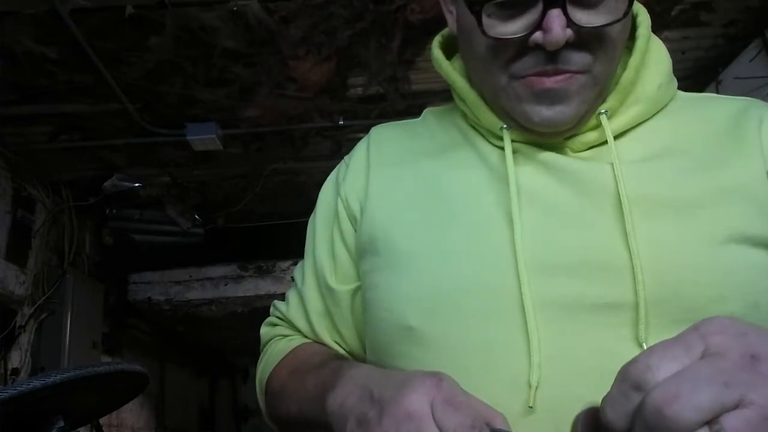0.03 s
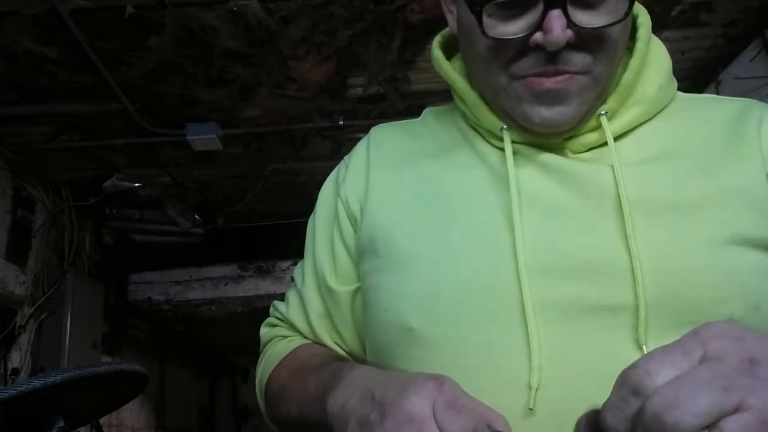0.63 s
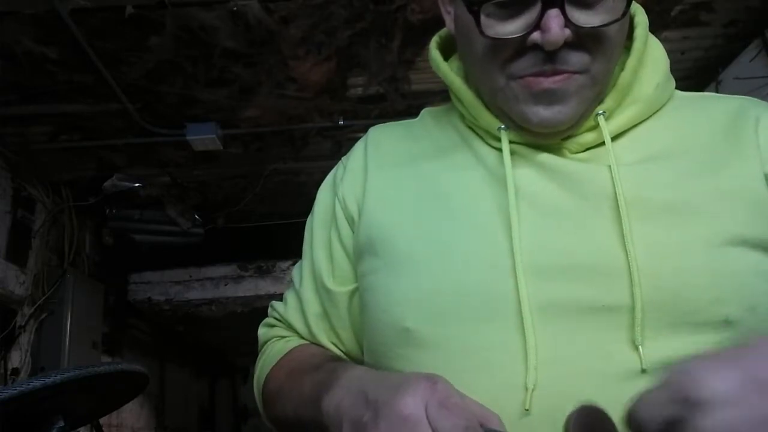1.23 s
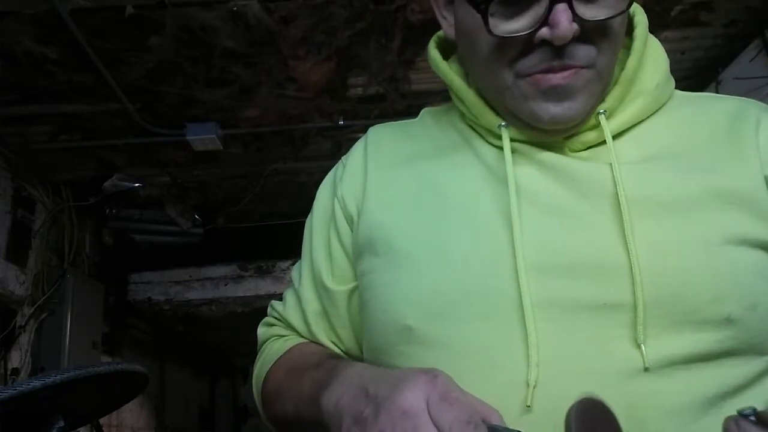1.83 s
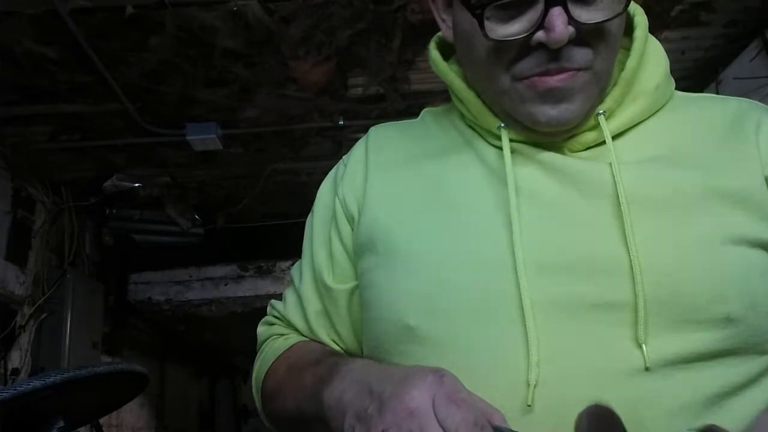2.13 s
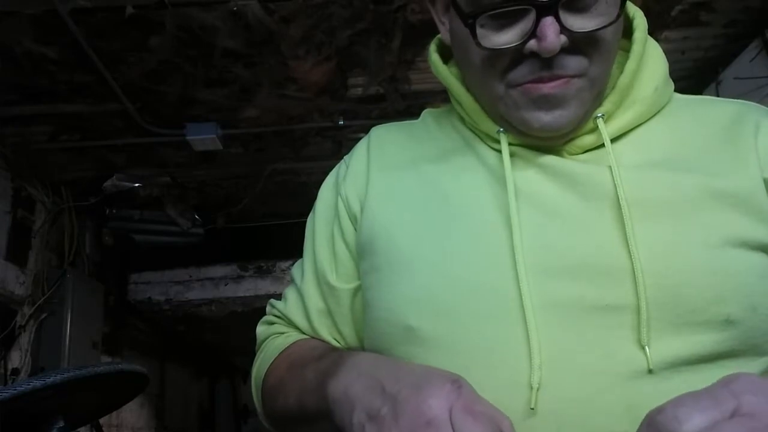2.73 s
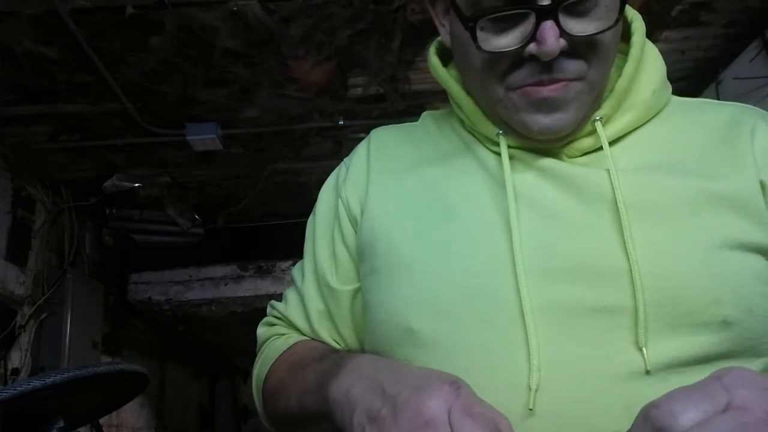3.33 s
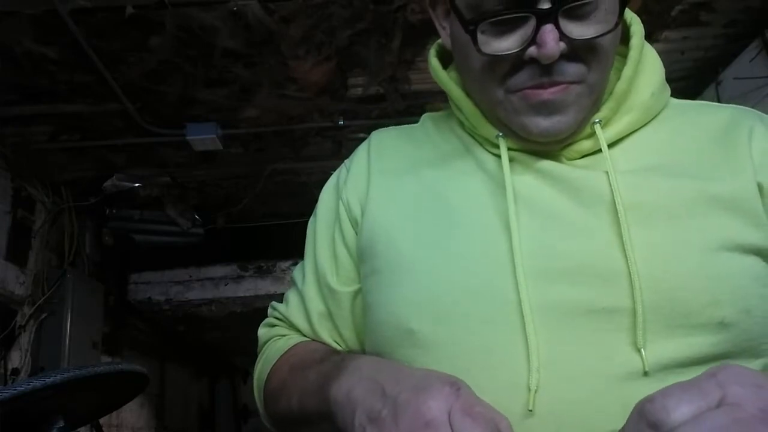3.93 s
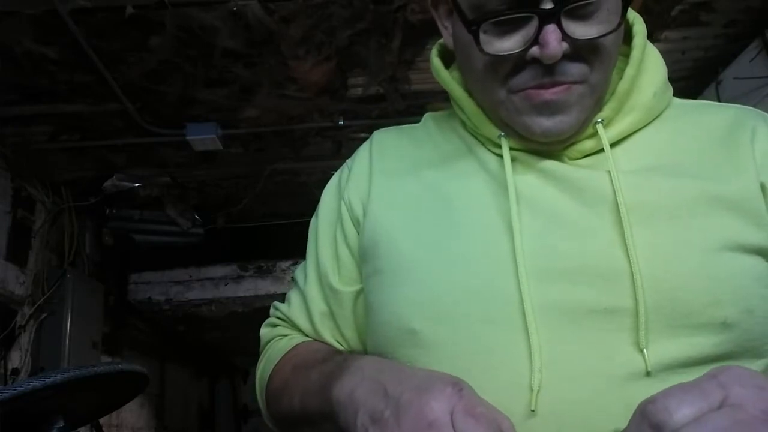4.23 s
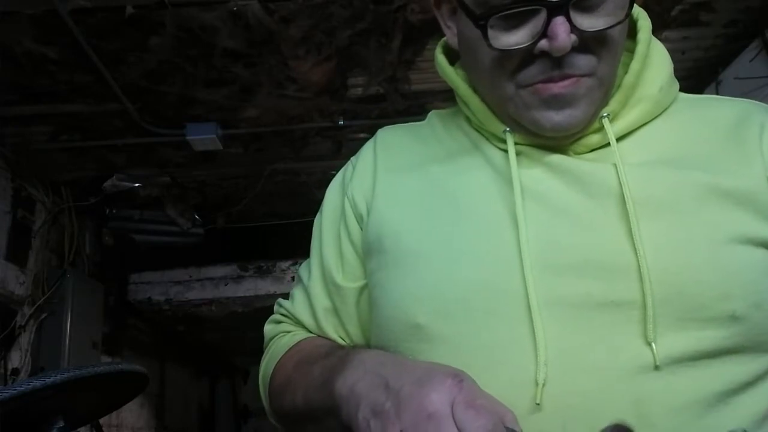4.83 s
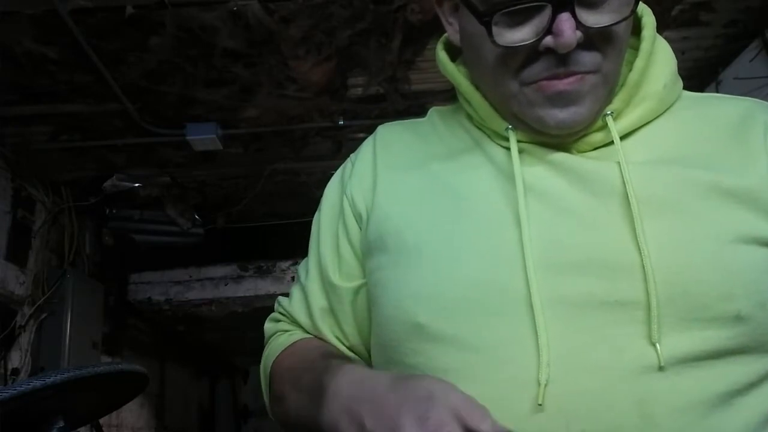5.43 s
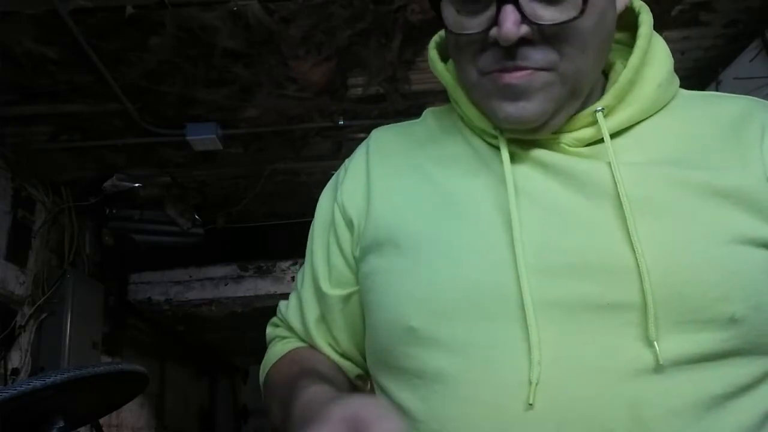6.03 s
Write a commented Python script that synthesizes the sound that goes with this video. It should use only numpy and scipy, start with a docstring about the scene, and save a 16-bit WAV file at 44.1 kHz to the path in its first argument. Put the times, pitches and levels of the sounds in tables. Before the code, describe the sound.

An abrasive disc on a whining handheld tool scrapes a metal pin twice, idling in between, before its switch snaps off.

```python
"""A handheld rotary tool spins an abrasive disc close to a camera microphone in a small workshop.
A metal pin is pressed to the disc in two passes, with a few short touches before the second; the disc
bites once a turn and the motor sags under the load. At the end the housing buzzes, the switch snaps off
and the motor coasts. The camera's gain control ducks under the grinding and lets the idle whirr swell back."""
import sys
import numpy as np
from scipy import signal
from scipy.fft import rfft, irfft, next_fast_len
from scipy.io import wavfile
from scipy.ndimage import uniform_filter1d, minimum_filter1d, map_coordinates

SR = 44100
rng = np.random.default_rng(int(sys.argv[2]) if len(sys.argv) > 2 else 0)


def transcribe(u):
    """Save the signal u as a 16-bit wav file named by the first command-line argument.

    u: samples, shape (n,) or (channels, n), limited to [-1, 1]; the rate is SR.
    q: integer samples, one column per channel.
    """
    v = np.clip(np.atleast_2d(u).T, -1, 1)
    q = np.round(v * 32767).astype(np.int16)
    wavfile.write(sys.argv[1], SR, q)


N = 267775
FREE_SPEED = 100  # turns per second with no load

# The level of the motor and its drone rises and falls over the scene. Each row: time in seconds, level in dB.
MOTOR_LEVEL = [(0, -5), (1.3, -1), (2.0, -1.5), (2.7, 2.5), (3.6, 3), (4.8, 5.5), (5.3, 2), (5.7, 3.5),
               (6.07, 3.5)]
# The pin meets the disc. Each row: start and end in seconds, scrape level in dB, landing tick in dB.
PIN_CONTACTS = [(-0.1, 1.253, -1, -20), (3.026, 3.037, -7.5, -2.5), (3.115, 3.169, 1.5, -3),
                (3.278, 3.323, 4, 4), (3.409, 3.48, 2.5, 0), (3.52, 4.521, 0.5, -7)]
# Colour of the scrape with the pin in its second grip. Each row: frequency in Hz, level in dB.
SECOND_GRIP_COLOUR = [(200, -47.5), (1100, -30), (2300, -19.5), (2850, -26), (3500, -13), (4450, -6),
                      (5200, -13), (6300, -3.5), (6900, 0.5), (8300, -6.5), (9100, -16), (11700, -19),
                      (13200, -31), (15500, -33)]
# The switch snaps and settles. Each row: start in seconds, level in dB, seconds to fall 60 dB.
SWITCH_CLICKS = [(5.937, 1, 0.018), (5.942, -12.5, 0.17), (5.954, -12, 0.03), (5.967, -14, 0.047)]


def amp(db):
    """Decibels to gain."""
    return 10 ** (np.asarray(db) / 20)


def unit(x):
    """Scale to rms 1."""
    return x / np.sqrt(np.mean(x ** 2) + 1e-20)


def along(points, hz):
    """(Hz, value) points read on a log axis."""
    freqs, values = np.transpose(points)
    return np.interp(np.log(hz + 1), np.log(freqs), values)


def curve(rows):
    """(seconds, value) rows as one value per sample."""
    times, values = np.transpose(rows)
    return np.interp(np.arange(N) / SR, times, values)


def wobble(rate):
    """A smooth random curve, rate knots a second."""
    return map_coordinates(rng.standard_normal(int(N * rate / SR) + 4), [np.arange(N) * rate / SR])


def held(start, end, rise_s, fall_db_per_s):
    """Gain that rises from start, holds until end and dies away."""
    t = np.arange(N) / SR
    return np.clip((t - start) / rise_s, 0, 1) * amp(-fall_db_per_s * np.maximum(t - end, 0))


def filtered(x, response):
    """Filter x by a response given as a function of Hz."""
    size = next_fast_len(N + SR // 2)
    return irfft(rfft(x, size) * response(np.fft.rfftfreq(size, 1 / SR)), size)[:N]


def coloured(x, response):
    """Filter x while keeping the power of white noise."""
    power = np.mean(np.abs(response(np.linspace(0, SR / 2, 4096))) ** 2)
    return filtered(x, lambda f: response(f) / np.sqrt(power))


def resonances(modes, f):
    """Causal response of (Hz, width in Hz, dB) modes."""
    return sum(amp(db) * 1j * f * width / (hz * hz - f * f + 1j * f * width) for hz, width, db in modes)


def bursts(rows):
    """A dying puff of noise for each row: start in seconds, level in dB, seconds to fall 60 dB."""
    t = np.arange(N) / SR
    envelope = sum((t >= start) * amp(db - 60 * np.abs(t - start) / t60) for start, db, t60 in rows)
    return envelope * rng.standard_normal(N)


def revolving(turns, repeat, renew):
    """Noise whose share repeat comes round each turn, in a pattern that wears away renew times a second."""
    rim = rng.standard_normal((int(N / SR * renew) + 4, 460))
    wear, angle = np.arange(N) / SR * renew, turns % 1 * rim.shape[1]
    pattern = map_coordinates(rim, [wear, angle], mode="grid-wrap")
    return np.sqrt(repeat) * unit(pattern) + np.sqrt(1 - repeat) * rng.standard_normal(N)


def motor(speed, turns, mains):
    """Shaft tones over brush hiss, growing with speed; the upper tones throb most with the mains."""
    # Each row: multiple of the shaft rate, level in dB. Multiples of 8 are the armature's slots and vanes.
    shaft_orders = [(7, -40.5), (8, -39.5), (9, -44), (10.5, -48), (15, -45), (16, -45), (17, -38),
                    (21.4, -49), (24, -37), (25, -44), (31, -39.5), (32, -40), (35, -47), (39, -49),
                    (40, -35.5), (43, -44), (44.6, -46), (47, -46), (56, -49), (62, -45), (64, -39),
                    (65, -43), (67, -41), (70, -42), (72, -29), (73, -43), (75, -43), (77, -45), (80, -43),
                    (88, -47), (96, -50), (112, -45), (113, -46), (120, -53)]
    # How well the casing radiates the tones. Each row: frequency in Hz, gain in dB.
    casing_gain = [(630, -12), (695, 0), (800, .5), (1650, 0), (2400, 1), (4000, 1.5), (5500, 0), (6350, 0),
                   (6550, 4), (6750, -1), (7200, 1), (7350, -4), (7600, 1), (11200, 0)]
    # Brush and fan hiss. Each row: frequency in Hz, level in dB.
    hiss_colour = [(25, -42), (60, -16), (180, -21.5), (380, -15), (560, -18.5), (780, -3), (1250, -16.5),
                   (2300, -9.5), (5200, -11), (7100, 2), (8600, -11), (11200, -16), (12600, -23.5),
                   (15500, -31.5)]
    pulse = np.cos(2 * np.pi * mains)
    tones = np.zeros(N)
    for multiple, db in shaft_orders:
        unsteadiness = np.sqrt(multiple / 40)
        jitter = .25 * unsteadiness * wobble(70)
        throb = 1 + .3 * unsteadiness * pulse
        phase = 2 * np.pi * (multiple * turns + rng.random()) + jitter
        flutter_db = 2 * unsteadiness * wobble(22.01)
        tones += amp(db + flutter_db) * throb * np.sin(phase)
    whine = filtered(tones, lambda f: amp(along(casing_gain, f)))
    brushes = revolving(turns, repeat=.25, renew=3)
    sparks = brushes * amp(0.11 * pulse + 0.46 * np.cos(2 * np.pi * turns) + 0.84 * wobble(700))
    hiss = unit(filtered(sparks, lambda f: amp(along(hiss_colour, f))))
    return amp(curve(MOTOR_LEVEL)) * (speed / speed.max()) ** 2 * (whine + amp(-25) * hiss)


def drone(speed, turns, mains):
    """The unbalanced disc shakes the tool once a turn, less when the pin steadies it; the windings hum."""
    shake_db = -39.5 - 5 * touching() + 1.2 * wobble(11)
    shake = amp(shake_db) * (speed / FREE_SPEED) ** 5 * np.sin(2 * np.pi * turns)
    hum = amp(-57) * np.sin(2 * np.pi * mains)
    return amp(curve(MOTOR_LEVEL)) * (shake + hum)


def touching():
    """How firmly the pin lies on the disc: it lands at once and fades as it lifts."""
    return sum(amp(db) * held(start, end, rise_s=0.0045, fall_db_per_s=434)
               for start, end, db, _ in PIN_CONTACTS)


def pressure(speed, regrip_s=2):
    """Strength of the scrape for each grip: only while the pin touches, and more as the motor labours."""
    # The hand's pressure in each pass. Each row: time in seconds, scrape level in dB.
    first_press = [(0.0, -16.5), (0.038, -22.5), (0.054, -15), (0.174, -22.5), (0.194, -17), (0.27, -19),
                   (0.326, -13.5), (0.386, -17), (0.748, -17), (0.8, -18.5), (0.86, -14.5), (0.946, -23),
                   (1.012, -17.5), (1.096, -23), (1.116, -17.5), (1.25, -19)]
    second_press = [(3.54, -17), (3.574, -15), (3.624, -15), (4.194, -16), (4.248, -13), (4.316, -15.5),
                    (4.416, -13.5), (4.468, -18.5), (4.52, -11)]
    force = touching() * amp(0.3775 * (FREE_SPEED - speed))
    early = np.arange(N) / SR < regrip_s
    return force * early * amp(curve(first_press)), force * ~early * amp(curve(second_press))


def patchy(x, depth_db):
    """The colour drifts in patches as the point of contact moves."""
    spectra = signal.stft(x, nperseg=512)[2]
    bands = uniform_filter1d(rng.standard_normal(spectra.shape), size=9, axis=0)
    patches = uniform_filter1d(bands, size=18, axis=1)
    return signal.istft(spectra * amp(depth_db * unit(patches)), nperseg=512)[1][:N]


def pin_response(colour):
    """The broad colour of the scrape with the sharp rings of pin and mandrel on top."""
    # Each row: frequency in Hz, width in Hz, level in dB relative to the scrape.
    pin_rings = [(4410, 60, -3), (4570, 60, 1), (4783, 45, -1), (4995, 80, 0), (5411, 45, -1),
                 (5884, 55, -1), (6770, 35, 3), (7077, 50, -4), (7314, 48, -1), (7475, 70, -4),
                 (7680, 30, -4), (8145, 35, -4)]
    return lambda f: amp(along(colour, f)) * (1 + resonances(pin_rings, f))


def grinding(turns, force, colour, bite_db, high_spot, patchy_db):
    """The disc runs out of true: its high spot bites once a turn and drags the same grit over the pin."""
    contact = np.tanh(1.33 * np.cos(2 * np.pi * (turns - high_spot) + 0.48 * wobble(40)))
    bite = amp(bite_db * contact + wobble(110) + wobble(900))
    grit = revolving(turns, repeat=.65, renew=9)
    scrape = unit(patchy(grit, patchy_db) * bite)
    fizz = filtered(rng.standard_normal(N), lambda f: 1 - 1 / (1 + (f / 8500) ** 8))
    scrape += amp(-3 + 1.6 * wobble(13)) * fizz  # the finest grit keeps hissing between bites
    return coloured(scrape * force, pin_response(colour))


def pin_ticks(t60_s=0.028):
    """The pin rings briefly as it lands on the disc."""
    landings = [(start, db, t60_s) for start, _, _, db in PIN_CONTACTS]
    return coloured(bursts(landings), pin_response(SECOND_GRIP_COLOUR))


def housing_buzz(mains):
    """Each half cycle of the mains jolts the loose housing; the buzz swells and holds until switch-off."""
    # Each row: frequency in Hz, width in Hz, gain in dB, for one trip through the shell.
    shell_modes = [(1660, 240, -7), (2615, 410, 3.5), (3300, 250, -3.5), (4120, 160, 0), (6460, 370, 2),
                   (7600, 250, -7)]
    cycles = mains + .007 * wobble(18)  # jolts come a little early or late
    jolts = np.diff(np.floor(cycles), prepend=0) * amp(3.6 * wobble(35))
    chatter = 0.2 * rng.standard_normal(N) * np.exp(-(cycles % 1) / 0.12)
    ringing = filtered(jolts + chatter, lambda f: resonances(shell_modes, f) ** 2)  # twice: dark valleys
    swell = held(start=5.45, end=SWITCH_CLICKS[0][0], rise_s=.28, fall_db_per_s=900)
    return amp(-22.5 + 1.8 * wobble(25)) * swell * unit(ringing)


def switch_snap(low_hz=1000, high_hz=8500):
    """The switch is thrown and its clicks ring the plastic body."""
    # Each row: frequency in Hz, width in Hz, gain in dB.
    plastic_modes = [(1790, 230, 4.5), (2750, 750, -2), (3270, 230, 1), (4670, 750, 3), (5660, 980, 2),
                     (6430, 450, 8.5), (9000, 1000, -32)]
    band = lambda f: f ** 2 / (f ** 2 + low_hz ** 2) / (1 + (f / high_hz) ** 4)
    return coloured(bursts(SWITCH_CLICKS), lambda f: resonances(plastic_modes, f) * band(f))


def coasting(turns, peak_s=6.015, width_s=0.018):
    """As the motor runs down, the falling slot tone swells briefly through a casing resonance."""
    swell = np.exp(-((np.arange(N) / SR - peak_s) / width_s) ** 2)
    return amp(-25) * swell * np.sin(2 * np.pi * 8 * turns)


def workshop(x, low_cut_hz=900):
    """A short, thin tail reaches the microphone off the cluttered walls; its treble dies first."""
    # Each row: frequency in Hz, seconds to fall 60 dB.
    decay_times = [(200, 0.16), (2000, 0.089), (7000, 0.089), (14000, 0.023)]
    hz, t, spectra = signal.stft(rng.standard_normal(SR // 3), SR, nperseg=256)
    decay = amp(-60 * t / along(decay_times, hz)[:, None])
    tail = signal.istft(spectra * decay, SR, nperseg=256)[1]
    echo = signal.fftconvolve(x, np.pad(tail, (130, 0)) / np.linalg.norm(tail))[:N]  # 3 ms late
    return amp(-17) * filtered(echo, lambda f: f ** 2 / (f ** 2 + low_cut_hz ** 2))


def scene():
    """The tool from close by, with a little of the room; one shaft times both motor and grinding."""
    # The shaft sags under load and at switch-off. Each row: time in seconds, turns per second.
    shaft_speed = [(0.0, 96.9), (0.05, 100.2), (0.15, 95.9), (0.25, 100.0), (0.41, 94.6), (0.88, 96.4),
                   (1.0, 93.8), (1.27, 93.9), (1.47, 100.1), (3.28, 99.1), (3.58, 92.9), (3.89, 91.7),
                   (4.31, 81.1), (4.48, 82.3), (4.73, 95.6), (4.97, 98.3), (5.12, 96.2), (5.19, 99.8),
                   (5.38, 98.9), (5.85, 103.0), (5.92, 101.6), (6.07, 86.5)]
    speed = curve(shaft_speed) * (1 + .007 * wobble(13))  # the speed control hunts a little
    turns = np.cumsum(speed) / SR
    mains = 120 * np.arange(N) / SR  # half cycles of the 60 Hz supply
    tool = motor(speed, turns, mains) + drone(speed, turns, mains) + housing_buzz(mains) + coasting(turns)
    knocks = pin_ticks() + switch_snap()
    first_force, second_force = pressure(speed)
    # Colour of the scrape with the pin in its first grip. Each row: frequency in Hz, level in dB.
    first_grip_colour = [(200, -38.5), (900, -32), (1350, -21), (2700, -16.5), (3700, -11.5), (4350, 2.5),
                         (5100, 0), (5750, -7), (6500, 6), (7500, -2), (8800, -6.5), (11600, -15.5),
                         (13000, -22), (15500, -30.5)]
    first = grinding(turns, first_force, first_grip_colour, bite_db=5.5, high_spot=0.063, patchy_db=1.1)
    second = grinding(turns, second_force, SECOND_GRIP_COLOUR, bite_db=4, high_spot=0.39, patchy_db=1.6)
    direct = tool + knocks + amp(12.5) * first + amp(12) * second
    return (direct + workshop(direct))[None]


def gain_control(x, threshold_db=-22, slope=0.68, attack_s=0.072, hold_s=0.32, release_s=0.53):
    """Gain falls as soon as the sound is loud, holds, then creeps back."""
    step = 1 / (attack_s * SR)
    power = signal.lfilter([step], [1, step - 1], x ** 2, zi=[np.mean(x[:SR // 10] ** 2)])[0]
    span, fade = int(hold_s * SR), int(release_s * SR)
    peak = -minimum_filter1d(-np.sqrt(power), span, origin=(span - 1) // 2, mode="nearest")
    level = np.maximum(peak, uniform_filter1d(peak, fade, origin=(fade - 1) // 2, mode="nearest"))
    return x * np.maximum(level / amp(threshold_db), 1) ** -slope


def record(dry):
    """The camera's mono microphone: gain control, soft saturation near full scale, no top above 15.7 kHz."""
    ducked = gain_control(dry[0])
    saturated = ducked / (1 + (ducked / .92) ** 6) ** (1 / 6)
    return filtered(saturated, lambda f: f < 15700)[None]


dry = scene()
out = record(dry)
transcribe(out)
```